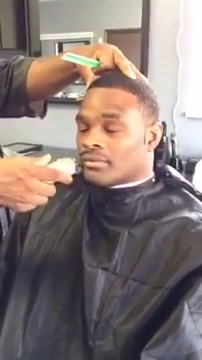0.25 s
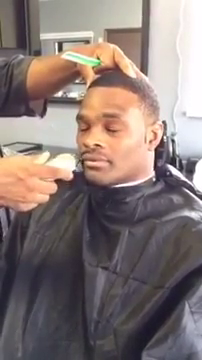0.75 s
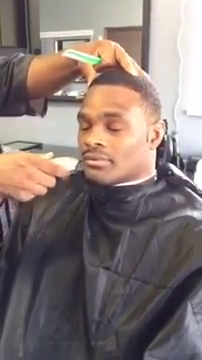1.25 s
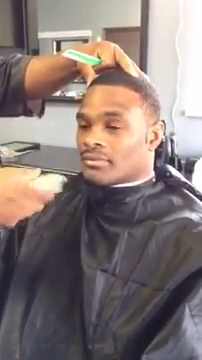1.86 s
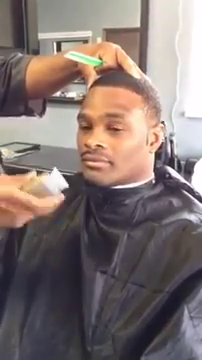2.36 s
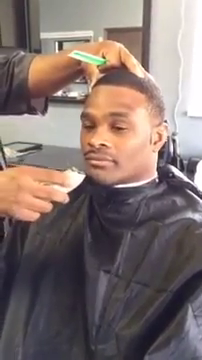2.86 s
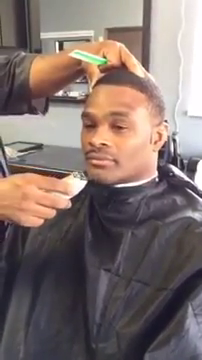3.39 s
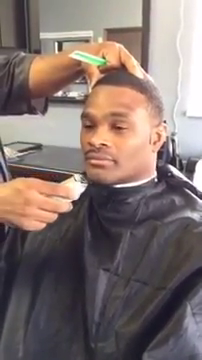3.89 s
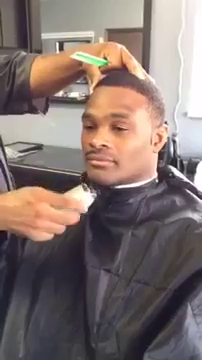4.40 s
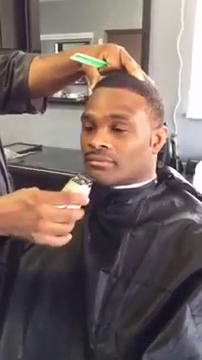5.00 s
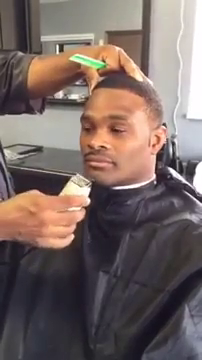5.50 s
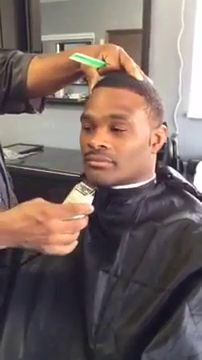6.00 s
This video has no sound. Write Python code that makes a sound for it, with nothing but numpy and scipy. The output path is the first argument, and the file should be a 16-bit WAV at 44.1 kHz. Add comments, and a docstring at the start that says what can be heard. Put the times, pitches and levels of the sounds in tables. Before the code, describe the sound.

Corded hair clippers buzz without a break about a metre from the microphone. Brief touches on stubble add crackle and hiss, sparse at first, then rougher and louder from the middle on, with tiny hair snaps. Four loud latch-like clacks and one light lever click cut through. Soft cloth thuds and low ventilation rumble lie beneath, in a small room with a short reverberation.

```python
"""Mains-driven hair clippers trim a beard in a small barbershop, about a metre from the microphone.
The blade swings 60 times a second and knocks at both ends of its stroke: a sum of mains harmonics.
At each touch stubble crackles and hisses as noise bursts at every half stroke; thick hairs snap.
A latch-like mechanism clacks four times and a small lever clicks: impulses with chatter, filtered by bodies.
Cloth thuds as puffs of low noise; ventilation rumbles as steady noise with a shaped spectrum."""
import sys
import numpy as np
from scipy import signal
from scipy.fft import rfft, irfft
from scipy.io import wavfile
from scipy.ndimage import uniform_filter1d, map_coordinates

SR = 44100
rng = np.random.default_rng(int(sys.argv[2]) if len(sys.argv) > 2 else 0)


def wrap_up_sound(samples):
    """Save the sound to the file named by the first command line argument, as 16-bit audio."""
    columns = np.atleast_2d(samples).T
    # keep every value between -1 and 1, then stretch to whole-number steps
    tamed = np.clip(columns, -1, 1)
    steps = np.round(tamed * 32767).astype(np.int16)
    wavfile.write(sys.argv[1], SR, steps)


N = 275625
TIME = np.arange(N) / SR
MAINS_HZ = 59.98


def amp(db):
    """Logarithmic level: decibels to amplitude gain."""
    return 10 ** (np.asarray(db) / 20)


def unit(x):
    """Normalization: scales a signal to an rms of one."""
    return x / np.sqrt(np.mean(x ** 2) + 1e-20)


def curves(table, t):
    """Linear interpolation: every column of a table at the times (or frequencies) t."""
    s, *columns = np.transpose(table)
    return [np.interp(t, s, column) for column in columns]


def read(points, hz):
    """Logarithmic frequency axis: a spectrum table interpolated at hz."""
    f, value = np.transpose(points)
    return np.interp(np.log(hz + 1), np.log(f), value)


def add(mix, s, sound):
    """Superposition: mixes a sound in at s seconds."""
    part = mix[max(round(s * SR), 0):][:len(sound)]
    part += sound[:len(part)]


def smooth_noise(count, size):
    """Moving average: Gaussian noise smoothed over size samples, rms one."""
    return unit(uniform_filter1d(rng.standard_normal(count), size=size))


def wander(path, count, order=8):
    """Sum of random sines: smooth chance of rms one, up to one cycle per unit of path, in count columns."""
    speed, start = rng.random((2, order, 1, count))
    return np.sqrt(2 / order) * np.sin(2 * np.pi * (speed * path[:, None] + start)).sum(0)


def colour(x, points, size=4096):
    """Minimum-phase filtering: rings x through a causal body of unit energy with the given spectrum."""
    log_gain = np.log(amp(read(points, abs(np.fft.fftfreq(size, 1 / SR)))))
    # the Hilbert transform of the log gain gives the phase of a causal body
    spectrum = np.exp(np.conj(signal.hilbert(log_gain)))
    ring = np.fft.ifft(spectrum).real[:size // 2]
    return signal.oaconvolve(x, ring / np.linalg.norm(ring))[:N]


GRAIN_DB = 5  # rough surfaces catch unevenly as they scrape


def blows(rows, chatter_s, chatter, rise=0.46, size=6144):
    """Impact excitation: an impulse a row (s, dB) with decaying chatter of the parts; long scrapes swell in."""
    out, t = np.zeros(N), np.arange(size) / SR
    for s, db in rows:
        grain = np.clip(smooth_noise(size, 40), -2, 2)
        blow = amp(GRAIN_DB * grain) * rng.standard_normal(size)
        blow *= np.exp(-t / max(chatter_s, 1 / SR))
        blow *= 1 - np.exp(-t / max(rise * chatter_s, 1 / SR))
        blow *= chatter / np.linalg.norm(blow)
        blow[0] += 1
        add(out, s, amp(db) * blow / np.linalg.norm(blow))
    return out


# reverberation time of the shop: (frequency [Hz], time to fall by 60 dB [s])
REVERBERATION = [(100, 0.15), (700, 0.53), (2000, 0.55), (8000, 0.35)]


def room(x, wet_db, size=22050):
    """Diffuse reverberation: adds a noise tail in which each band decays exponentially at its own speed."""
    hz, t, z = signal.stft(rng.standard_normal(size), SR, nperseg=256)
    decay = np.exp(-np.log(1000) * t / read(REVERBERATION, hz)[:, None])
    tail = signal.istft(z * decay, SR, nperseg=256)[1]
    tail *= np.minimum(np.arange(len(tail)) / SR / 0.00064, 1) ** 2  # soft onset [s]
    return x + amp(wet_db) * signal.oaconvolve(x, tail / np.linalg.norm(tail))[:N]


# spectrum of the ventilation: (frequency [Hz], relative spectral density [dB])
VENTILATION_SPECTRUM = [(20, -23), (40, -31), (56, -10), (75, -18.5), (95, 5.5), (112, -6.5), (135, -3),
                        (165, -13.5), (280, -17), (450, -27), (750, -13.5), (1050, -34), (2000, -43),
                        (2600, -34), (9000, -59.5)]


def ventilation(level_db=-51.5, waver_db=0.95, waver_hz=7):
    """Shaped broadband noise: a wavering rumble gathered in a low resonance of the room."""
    gain = amp(read(VENTILATION_SPECTRUM, np.fft.rfftfreq(N, 1 / SR)))
    rumble = unit(irfft(rfft(rng.standard_normal(N)) * gain, N))
    waver = waver_db * wander(TIME * waver_hz, count=1)[:, 0]
    return amp(level_db + waver) * rumble


# soft thuds of cloth as the arm moves: (time [s], level before the swell [dB], centre frequency [Hz])
CLOTH_THUDS = [(.03, -51, 130), (.12, -49, 136), (1.83, -48, 128), (1.883, -48.5, 304), (1.94, -43.5, 128),
               (1.965, -52, 269), (2.019, -50, 133), (4.68, -57, 130), (4.93, -58.5, 300), (5.06, -51, 90),
               (5.45, -49, 98)]


def cloth_thuds(swell_s=0.02, width=0.24):
    """Narrow-band noise under a slow envelope: dull, soft-edged puffs."""
    out, f = np.zeros(N), np.fft.rfftfreq(8192, 1 / SR)
    for s, db, hz in CLOTH_THUDS:
        band = np.exp(-((f / hz - 1) / width) ** 2)
        phase = np.exp(2j * np.pi * rng.random(len(f)))
        puff = unit(irfft(rng.standard_normal(len(f)) * phase * band))
        age = np.arange(len(puff)) / SR / swell_s
        add(out, s, amp(db) * age * np.exp(1 - age) * puff)
    return out


# small hard clicks, as of the blade lever: (time [s], relative level [dB])
LEVER_CLICKS = [(2.4238, -1.5), (2.4255, -5.5), (2.495, -14), (2.5365, -10.5), (2.546, -12.5)]
# resonances of the lever: (frequency [Hz], relative level [dB])
LEVER_SPECTRUM = [(100, -61), (1200, -26), (2300, -13), (3000, 1), (4200, 3), (5600, 6), (7000, 4.5),
                  (8500, -16)]


def lever():
    """Brief contact excites high resonances: light, bright clicks with little chatter."""
    clicks = blows(LEVER_CLICKS, chatter_s=0.001, chatter=0.4)
    return amp(-8) * room(colour(clicks, LEVER_SPECTRUM), wet_db=-3.5)


# main blows of the clacking mechanism: (time [s], relative level [dB])
CLACK_BLOWS = [(1.765, -1.5), (3.8492, -0.5), (4.2725, -1), (6.212, 0)]
# its parts scrape and meet in the same order every time:
# (time from the main blow [s], relative dull knock [dB], relative bright tick [dB], decay constant [s])
CLACK_CONTACTS = [(-.058, -8, -8.5, 0.051), (-.043, -7, -3.5, 0.043), (-.018, -16, -15, 0.012),
                  (-.012, -9.5, -6, .003), (0, 0, -3.5, 0.0033), (.005, -1, 1.5, .003),
                  (.014, -10.5, -16.5, 0.011), (.028, -6, -10, 0.026), (.053, -6.5, -10, 0.02),
                  (.066, -19.5, -21, 0.024)]
# resonances behind the dull knock: (frequency [Hz], relative level [dB])
KNOCK_SPECTRUM = [(60, -27.5), (250, -21.5), (380, -13), (480, -14), (700, 1), (930, -4), (1200, 0),
                  (1600, 1.5), (2000, 1.5), (2500, -5.5), (3300, -6), (4500, -14.5), (9000, -33.5)]
# resonances behind the bright tick: (frequency [Hz], relative level [dB])
TICK_SPECTRUM = [(100, -60.5), (1200, -17.5), (2400, 4.5), (3200, -4.5), (4000, 4), (4800, 1), (6100, 5.5),
                 (7200, 2.5), (8500, -14.5)]


def clacks(hardness_s=0.002):
    """Impact and friction: soft scrapes around one hard double blow, with the room ringing after it."""
    knocks, ticks = np.zeros((2, N))
    for late, knock_db, tick_db, decay_s in CLACK_CONTACTS:
        chatter = 2 * decay_s / hardness_s  # a long contact is nearly all scrape
        knocks += blows([(s + late, db + knock_db) for s, db in CLACK_BLOWS], decay_s, chatter)
        ticks += blows([(s + late, db + tick_db) for s, db in CLACK_BLOWS], decay_s, chatter)
    dull = room(amp(0.5) * colour(knocks, KNOCK_SPECTRUM), wet_db=-8.0)
    bright = room(amp(-10.0) * colour(ticks, TICK_SPECTRUM), wet_db=-0.5)
    return dull + bright


# the hand: (time [s], hold [0 cheek, 1 lip, 2 jaw, 3 under the chin], place along its path [hand widths])
HAND_MOTION = [(0, -0.5, 0.5), (1.3, 0.34, 1.84), (1.8, -0.4, 3), (2.1, 0.88, 6), (2.6, 1, 9),
               (3, 1.1, 8.5), (3.4, 2.04, 9.5), (4.3, 2, 11), (4.6, 2.5, 12), (4.86, 2.5, 14),
               (5.8, 3.5, 16.5), (6.25, 1.5, 15)]


def hand(t):
    """Source kinematics: the hold of the clippers and the place along the path at the times t."""
    return curves(HAND_MOTION, t)


# touches of the blade on the beard: (start [s], length [s], crackle through the housing before shaping [dB],
# hiss at the teeth before shaping [dB])
BEARD_TOUCHES = [(0, 0.051, -51.5, -74), (.19, 0.14, -44.5, -56), (0.49, 0.067, -47, -57),
                 (0.782, .13, -47.5, -61), (1.304, 0.75, -50.5, -61.5), (2.421, 0.19, -60.5, -62),
                 (3.016, .39, -45, -53.5), (3.453, 0.25, -44.5, -54), (3.594, 0.062, -37, -44.5),
                 (3.664, 0.22, -46.5, -52.5), (3.974, 0.63, -44, -48), (4.068, .25, -39, -53),
                 (4.458, 0.087, -35.5, -42.5), (4.628, .18, -63, -53), (5.221, 0.18, -42, -51.5),
                 (5.55, .17, -56.5, -57.5), (5.771, .36, -40, -51.5)]
BITE_S, RELEASE_S = 0.066, 0.043  # a touch takes hold linearly, then dies away exponentially
IDLE_CRACKLE_DB, IDLE_HISS_DB = -52.5, -72  # the blade rubbing in free air
ARCH_DB = 2.5  # a touch presses hardest in its middle


def contact():
    """Energy addition: crackle and hiss levels (dB); touches rise, hold and die away over the idle rub."""
    power = amp([[IDLE_CRACKLE_DB], [IDLE_HISS_DB]]) ** 2
    t = TIME[::64]
    for start, length, crackle_db, hiss_db in BEARD_TOUCHES:
        age = np.maximum(t - start, 0)
        shape = np.minimum(age / BITE_S, 1) * np.exp(-np.maximum(age - length, 0) / RELEASE_S)
        arch = np.sin(np.pi * np.minimum(age / length, 1)) - 2 / np.pi  # zero mean over the touch
        shape *= amp(ARCH_DB * arch)
        power = power + (amp([[crackle_db], [hiss_db]]) * shape) ** 2
    return [np.interp(TIME, t, 10 * np.log10(p)) for p in power]


FULL_LOAD_DB = -39  # crackle level near which the load saturates


def loading():
    """Saturating mechanical load: how hard hair loads the blade, 0-1."""
    return np.tanh(uniform_filter1d(amp(contact()[0] - FULL_LOAD_DB), size=2000))


def stroke(lag=0.0086, jitter=0.003):
    """Synchronous drive: turns locked to the mains, lagging and stumbling slightly when hair loads the blade."""
    stumble = unit(uniform_filter1d(uniform_filter1d(rng.standard_normal(N), 700), 700))
    return MAINS_HZ * TIME - loading() * (lag + jitter * stumble)


def bites(turns, uneven_db, bite_length, between):
    """Periodically modulated noise: each half stroke shears a different number of hairs."""
    half = np.floor(2 * turns + 1).astype(int)
    hairs = amp(uneven_db * np.clip(rng.standard_normal(N), -2, 2))[half]
    burst = between + np.exp(-(2 * turns % 1) / bite_length)
    return hairs * burst * rng.standard_normal(N)


# the teeth sliding on each other, heard between the touches too: (frequency [Hz], relative level [dB])
RUB_SPECTRUM = [(100, -41.5), (2450, 0), (2950, 1.5), (3450, 14), (4200, 6), (4800, -1), (5700, -6.5),
                (6700, 13.5), (7600, -2.5), (9000, -18.5)]
RUB_DB = -74


def rubbing(turns):
    """Sliding friction: the bare teeth whisper at every half stroke."""
    scrape = bites(turns, uneven_db=7.5, bite_length=0.27, between=0.2)
    return amp(RUB_DB) * unit(room(colour(scrape, RUB_SPECTRUM), wet_db=3.0))


# crackle through the housing: (frequency [Hz], relative level [dB])
CRACKLE_SPECTRUM = [(100, -49.5), (480, -31), (660, -6), (850, -7.5), (1030, -13), (1250, -4), (1420, -2),
                    (1650, 9), (1850, 0.5), (2150, -4), (2450, -16.5), (4000, -23), (9000, -79)]
# against the cheek the crackle also rings a little lower: (frequency [Hz], relative level [dB])
CHEEK_SPECTRUM = [(100, -47), (850, -22.5), (1080, -7), (1220, 3.5), (1400, -19), (9000, -70.5)]
# hiss of the longer beard at the teeth: (frequency [Hz], relative level [dB])
HISS_SPECTRUM = [(100, -47.5), (1500, -9), (2300, 7), (2560, 9), (2900, 5), (3450, 7.5), (4200, 5),
                 (4800, 0), (5800, 2.5), (6600, 2.5), (7400, 2.5), (9000, -27)]
# thick hairs snapping: (time [s], relative level [dB])
HAIR_SNAPS = [(.524, -21), (.56, -24), (.814, -24), (.839, -17), (.901, -20), (1.356, -21), (1.415, -18),
              (1.472, -12), (1.633, -21), (3.118, -18), (3.611, -17), (3.643, -12), (3.719, -14),
              (4.002, -17), (4.093, -14), (4.163, -11), (4.188, -9), (4.472, -11), (4.513, -8),
              (5.285, -18), (5.389, -13), (5.414, -13), (5.995, -13)]
HAIR_DB = 1  # single hairs differ in thickness, so the hiss is grainy
FLUTTER_DB, FLUTTER_MAX_HZ = 1.5, 24.95  # the beard is patchy, so a touch flutters; depth at full load


def cutting(turns):
    """Fracture noise: stubble crackles through the housing and hisses at the teeth; thick hairs snap."""
    crackle_db, hiss_db = contact()
    at_cheek = np.clip(1 - hand(TIME)[0], 0, 1)
    shear = room(bites(turns, uneven_db=2, bite_length=0.37, between=0.3), wet_db=-0.5)
    crackle = unit(colour(shear, CRACKLE_SPECTRUM))
    crackle += amp(-7.5) * at_cheek * unit(colour(shear, CHEEK_SPECTRUM))

    # short stubble on the cheek only rings the teeth; the longer beard hisses more broadly
    hairs = amp(HAIR_DB * np.clip(smooth_noise(N, 40), -2.5, 2.5))
    scrape = room(hairs * bites(turns, uneven_db=1.5, bite_length=0.55, between=1.0), wet_db=-7)
    hiss = at_cheek * unit(colour(scrape, RUB_SPECTRUM))
    hiss += (1 - at_cheek) * unit(colour(scrape, HISS_SPECTRUM))

    snaps = blows(HAIR_SNAPS, chatter_s=.002, chatter=1.0)
    snaps = colour(snaps, CRACKLE_SPECTRUM) + amp(-14) * colour(snaps, HISS_SPECTRUM)
    patches = wander(TIME * FLUTTER_MAX_HZ, count=1)[:, 0]
    flutter = amp(FLUTTER_DB * np.sqrt(loading()) * patches)
    return flutter * (amp(crackle_db) * crackle + amp(hiss_db) * hiss) + room(snaps, wet_db=-3.5)


DIP_HZ, DIP_WIDTH_HZ, DIP_DEPTH = 2550, 300, .9  # depth is the share of amplitude removed at the centre


def band_dip(x):
    """Band rejection: the blade's noise is thinner around 2550 Hz in the hold under the chin."""
    band = np.exp(-((np.fft.rfftfreq(N, 1 / SR) - DIP_HZ) / DIP_WIDTH_HZ) ** 2)
    under_chin = np.clip(hand(TIME)[0] - 2, 0, 1)
    return x - DIP_DEPTH * under_chin * irfft(rfft(x) * band, N)


SPREAD_S = .005  # scatter of the delays with which the knocks reach the microphone


def knock_phases(ring_s, count, size=1024):
    """Group delay: phases of two ringing knocks a swing, each spectral region leaving with its own delay."""
    age = np.arange(size) % (size // 2) / size / MAINS_HZ
    swing = np.exp(-age / ring_s) * rng.standard_normal(size)
    delay_s = SPREAD_S * smooth_noise(count, 12)
    phase = np.angle(rfft(swing)[1:count + 1])
    return np.exp(1j * (phase + 2 * np.pi * MAINS_HZ * np.cumsum(delay_s)))


# multiples of the mains that the housing radiates well: (harmonic number)
STRONG_HARMONICS = [10, 11, 12, 14, 16, 18, 20, 22, 24, 26, 27, 28, 29, 30, 31, 32, 33, 34, 35, 36, 38]
# their levels as the housing is turned, one row each for cheek, lip, jaw and under the chin:
# (relative level [dB] of each strong harmonic in turn)
HOLD_LEVELS = [(-6.5, -15, -9, -15, -37, -15.5, -16, -26.5, -37, -5, -18, -10, -18, -14.5, -13, -14, -32, -18, -15.5, -28.5, -31),
               (-4.5, -9.5, -3, -22.5, -13, -18.5, -23.5, -16, -10.5, -6, -8, -5.5, -8.5, -7.5, -16, -14, -14.5, -14, -11.5, -17, -26),
               (-6.5, -13.5, -1.5, -13.5, -13.5, -15, -24, -2.5, -29.5, 4, -7, -4.5, -17.5, -12.5, -30.5, -6.0, -18.5, -9, -29.5, -10, -26.5),
               (-9.5, -13, -0.5, -7, -24, -41, -18, -9.5, -24, 0, -13.5, -7, -16.5, -1.5, -17, -15, -17.5, -12.5, -20, -13.5, -15.5)]
# all the other multiples: (frequency [Hz], relative level [dB])
WEAK_HARMONICS = [(540, -52), (780, -29), (900, -28), (1020, -30), (1140, -26), (1260, -42.5), (1380, -36),
                  (1500, -21.5), (2220, -23.5), (2340, -25.5)]
# ring of the teeth as they are turned:
# (frequency [Hz], relative level at cheek [dB], at lip [dB], at jaw [dB], under the chin [dB])
TEETH_RING = [(2400, -13, -3.5, 6, -21.5), (2480, -3, -12.5, -1.5, -18.5), (2700, 1.5, -3, 2, -8),
              (3090, -15, -13.5, -6.5, -9.5), (3250, -5, 1.5, 9.5, -2.5), (3710, -2.0, -4.5, 4.5, -0.5),
              (3830, -11, -8.5, -8.0, -10), (4300, -7.5, -9.5, -4.5, -6.5),
              (4620, -20.5, -19.5, -19.5, -21.5), (5300, -18, -18.5, -13.5, -18.5),
              (5830, -18, -17.5, -20, -13), (6500, -11, -13.5, -31, -9.5), (7100, -17.5, -16, -28, -15),
              (8150, -15, -29.5, -14.5, -11), (8300, -37, -37.5, -34.5, -48)]
# how loudly the housing faces the microphone:
# (time [s], hum [dB], buzz of the blade before loading [dB], ring of the teeth [dB])
FACING_LEVELS = [(0, -48.5, -46.5, -56), (.85, -48, -49, -56.5), (1.25, -46, -45.5, -58),
                 (1.6, -51.5, -45.5, -57), (1.88, -49, -47.5, -56.5), (2.02, -44, -45.5, -54),
                 (2.18, -49, -40, -53.5), (2.3, -45, -44.5, -51.5), (2.55, -50, -45, -56),
                 (2.7, -46.5, -42.5, -55), (3.6, -45.5, -44, -52), (4.6, -46.5, -40.5, -53.5),
                 (4.68, -43.5, -44, -56), (4.79, -48, -48.5, -55), (4.88, -45.5, -41, -55.5),
                 (5.52, -45.5, -41.5, -58), (6.25, -45.5, -42.5, -55.5)]
LOAD_BUZZ_DB = 2  # pressing into hair loads the blade: the buzz swells
ODD_DB = -8  # odd multiples in the ring of the teeth are set lower here
RATTLE = 1.15  # share by which the highest multiple changes, in proportion to harmonic number
TREMOR, TREMOR_MAX_HZ = .45, 5  # the hand trembles, so the upper multiples waver


def motor(turns, housing_ring_s=0.009, teeth_ring_s=0.004, echo_db=-3.5, uneven_db=0.55, count=140, size=4096):
    """Fourier synthesis and interference: the blade's harmonics swell and fade by reflection as the hand moves."""
    t, k = TIME[::size // 8], np.arange(1, count + 1)
    hum_db, buzz_db, teeth_db = curves(FACING_LEVELS, t)
    buzz_db = buzz_db + LOAD_BUZZ_DB * loading()[::size // 8]
    hold, path = hand(t)
    last = len(HOLD_LEVELS) - 1
    distance = abs(np.clip(hold, 0, last)[:, None] - np.arange(last + 1))
    blend = np.maximum(1 - distance, 0)

    weak_db, strong = read(WEAK_HARMONICS, k * MAINS_HZ), np.isin(k, STRONG_HARMONICS)
    poses = [np.where(strong, np.interp(k, STRONG_HARMONICS, row), weak_db) for row in HOLD_LEVELS]
    housing = amp(blend @ poses) * knock_phases(housing_ring_s, count)
    ring_db = blend @ curves(TEETH_RING, k * MAINS_HZ) + ODD_DB * (k % 2)
    teeth = amp(ring_db) * knock_phases(teeth_ring_s, count)
    # the loose teeth never land twice in quite the same way
    scatter = rng.standard_normal(teeth.shape) + 1j * rng.standard_normal(teeth.shape)
    teeth *= 1 + RATTLE * k / count * scatter

    # reflections add to the direct sound, and matter more for short waves
    echoes = wander(path * 1.174, count) + 1j * wander(path * 1.194, count)
    echoes += TREMOR * (wander(t * TREMOR_MAX_HZ, count) + 1j * wander(t * TREMOR_MAX_HZ, count))
    fading = 1 + amp(echo_db) * np.minimum(k / 40, 1) * echoes

    low, middle, high = (k > 8) & (k < 18), (k >= 18) & (k < 40), k >= 40
    lines = np.zeros((len(t), count), complex)
    for band, shape, level_db in ((low, housing, hum_db), (middle, housing, buzz_db), (high, teeth, teeth_db)):
        part = band * shape * fading
        lines += part * (amp(level_db) / np.linalg.norm(part, axis=1))[:, None]

    # one waveform cycle per time step, then read along time and blade phase
    cycles = irfft(np.pad(lines, ((0, 0), (1, 0))), size) * size / np.sqrt(2)
    buzz = map_coordinates(cycles, [TIME / t[1], turns % 1 * size], order=1, mode="nearest")
    force = amp(uneven_db * smooth_noise(N, 500))
    # the coil itself hums at twice the mains
    magnet = amp(-59.5) * np.sqrt(2) * np.sin(2 * np.pi * 2 * turns)
    return force * buzz + magnet


def scene():
    """Linear superposition: all sources at one microphone."""
    turns = stroke()
    background = ventilation() + cloth_thuds() + lever() + clacks()
    blade_noise = band_dip(cutting(turns) + rubbing(turns))
    return (background + blade_noise + motor(turns))[None]


EDGE_HZ = 8400


def record(dry):
    """Band limitation: the recorder's linear-phase low-pass."""
    lowpass = signal.firwin(601, EDGE_HZ, window=("kaiser", 8), fs=SR)
    return signal.oaconvolve(dry, lowpass[None], "same")


dry = scene()
out = record(dry)
wrap_up_sound(out)
```